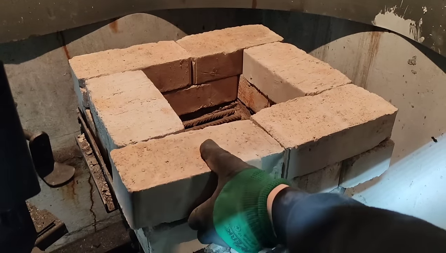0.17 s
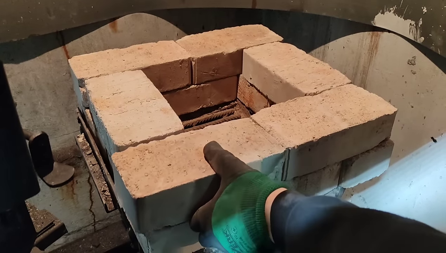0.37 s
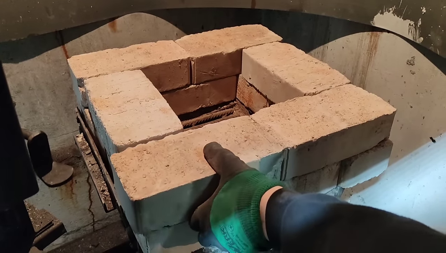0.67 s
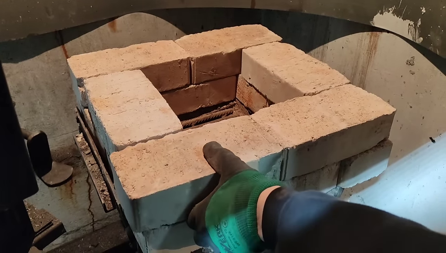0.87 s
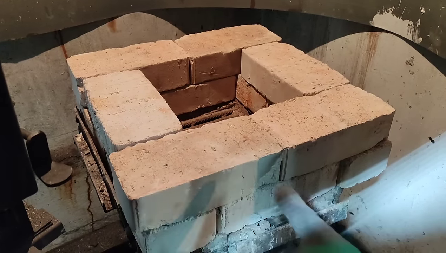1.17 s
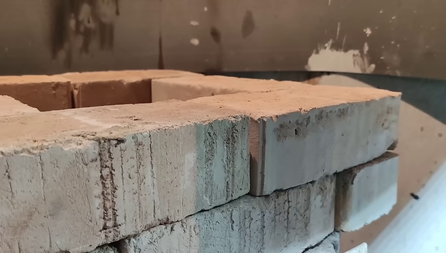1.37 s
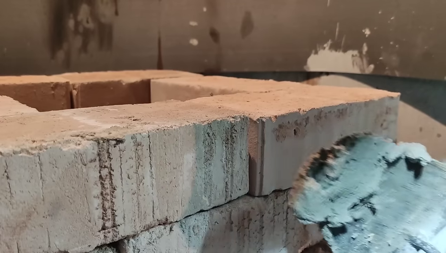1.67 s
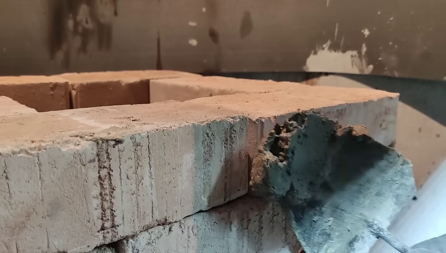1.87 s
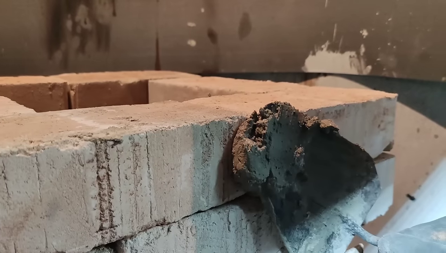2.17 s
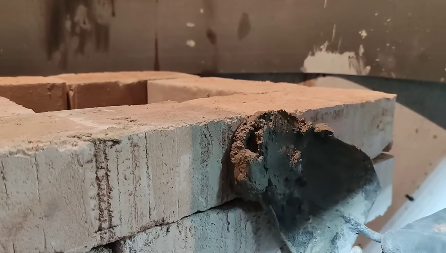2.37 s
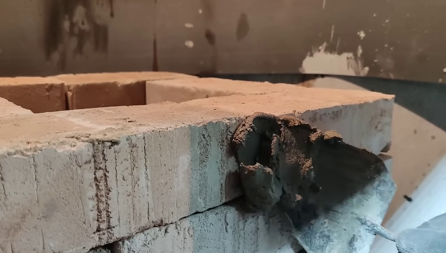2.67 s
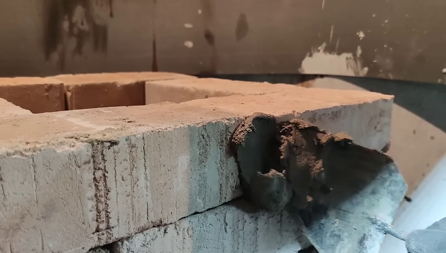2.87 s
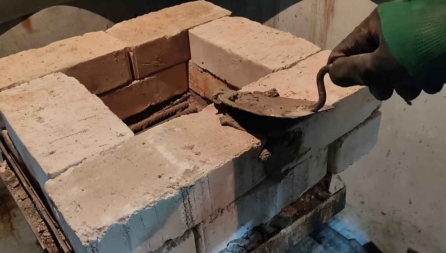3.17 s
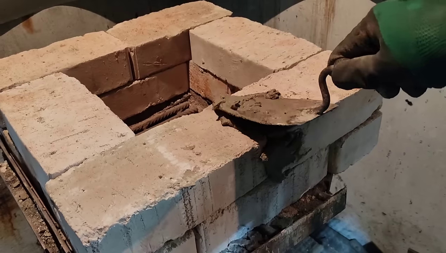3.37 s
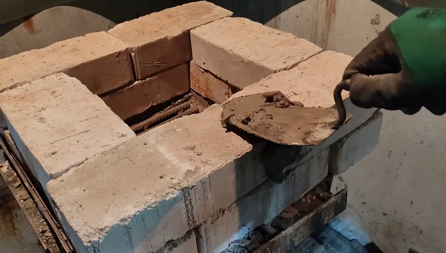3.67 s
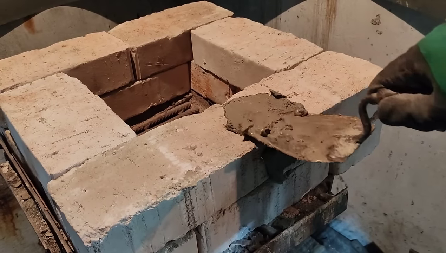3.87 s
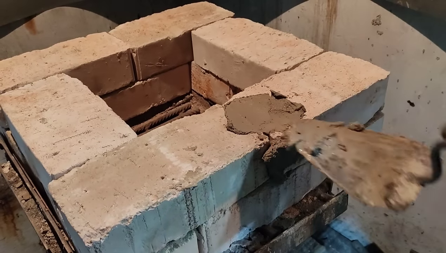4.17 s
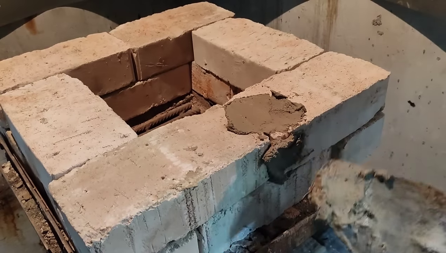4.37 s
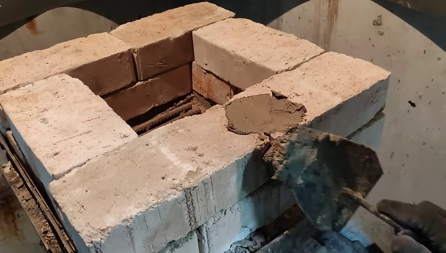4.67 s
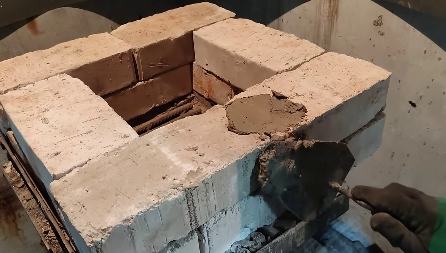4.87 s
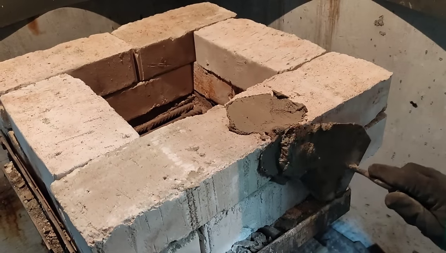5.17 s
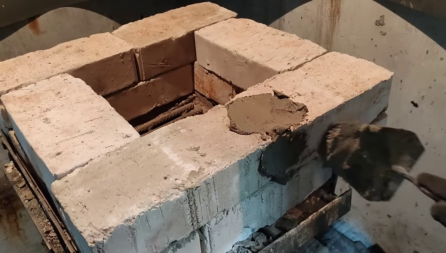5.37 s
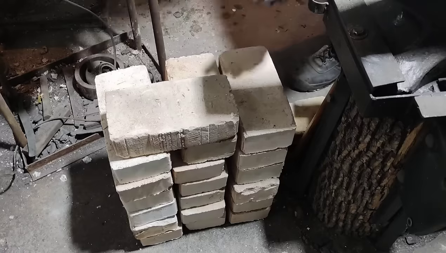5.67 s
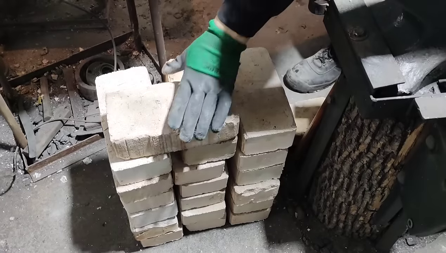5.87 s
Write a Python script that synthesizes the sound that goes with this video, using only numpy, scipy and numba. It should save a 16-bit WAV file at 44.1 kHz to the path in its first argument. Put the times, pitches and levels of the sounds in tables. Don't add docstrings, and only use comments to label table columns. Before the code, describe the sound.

Faint rubbery rubs on brick give way to bright, sandy trowel scrapes, metallic ticks and short ringing squeaks, with abrupt scene cuts.

```python
import sys
import numpy as np
from scipy import signal
from scipy.fft import rfft, irfft, next_fast_len
from scipy.io import wavfile
from scipy.ndimage import uniform_filter1d
from numba import njit

SR = 44100
rng = np.random.default_rng(int(sys.argv[2]) if len(sys.argv) > 2 else 0)


def wav_record(signal):
    frames = np.transpose(np.atleast_2d(signal))
    bounded = np.clip(frames, -1, 1)
    quanta = np.round(bounded * 32767).astype(np.int16)
    wavfile.write(sys.argv[1], SR, quanta)


def field_ratio(decibels):
    return 10 ** (np.asarray(decibels, dtype=float) / 20)


N = 265482
SIZE = next_fast_len(N + SR // 2)
HZ = np.arange(SIZE // 2 + 1) * SR / SIZE + 1e-3
TIME = np.arange(N) / SR

BAND_EDGES_HZ = [700, 2000, 4500, 9000]
CUTS_S = 3.246, 5.716
# frequency in Hz, level in dB per Hz.
SCRAPE_SPECTRUM = [(71, -33), (120, -32.5), (301, -9), (355, -22.5), (503, -15.5), (742, -13.5), (1210, -6),
                   (1430, -6.5), (4230, -8), (7200, 2.5), (10200, -12.5), (15000, -7.5), (16000, -2.5)]
# frequency in Hz, t60 in seconds, level over the dense modes in dB.
BLADE_MODES = [(259, 0.14, 3), (310.3, 0.51, 21), (522, 0.33, -20), (905, 0.1, 9), (1194.6, 0.12, 13.5),
               (1336, 0.057, 17), (1614.6, 0.081, 39), (2290, 0.14, -4.5), (2520, 0.3, -28)]
# start in seconds, end in seconds, first pitch in Hz,
# last pitch in Hz, level in dB.
EDGE_TONES = [(2.195, 2.26, 2600, 2550, 1.5), (2.21, 2.32, 926, 736, 9), (3.5, 3.8, 1980, 2010, -9),
              (2.35, 2.47, 2440, 2340, 3), (2.36, 2.7, 1590, 1250, 6), (2.46, 2.68, 4500, 4500, -0.5),
              (2.71, 2.78, 2520, 2470, 3), (2.72, 2.93, 3850, 3970, -5), (2.78, 2.95, 970, 1030, -2.5),
              (3.17, 3.24, 1736, 1700, 5), (3.25, 3.345, 1830, 1850, 12.5), (3.342, 3.54, 1730, 1870, 4),
              (3.342, 3.38, 3100, 3080, 3), (3.36, 3.9, 960, 960, -8.5), (3.84, 3.9, 6600, 6460, -4),
              (3.95, 4.3, 3360, 3020, 6.5), (4.05, 4.45, 1280, 1250, -5.5), (5.036, 5.085, 1365, 1350, 9),
              (5.11, 5.42, 1450, 1370, 0.5), (5.21, 5.31, 2480, 2760, 0), (5.4, 5.68, 1200, 1165, -2),
              (5.6, 5.715, 1730, 1740, 7), (5.8, 5.85, 1738, 2090, 1), (5.88, 5.97, 2300, 2200, 4)]


def trowel(ears, pressure):
    under = [0 * HZ] + [below(hz) for hz in BAND_EDGES_HZ] + [0 * HZ + 1]
    tone = causal(colour(SCRAPE_SPECTRUM))
    bands = [np.sqrt(np.maximum(high - low, 0)) * tone for low, high in zip(under, under[1:])]
    audible = (HZ > 200) & (HZ < 15500)
    bands = [band / np.sqrt(np.mean(abs(band * audible) ** 2)) for band in bands]
    force = pressure * grit(2000, 3.5, hiss=0.58, chatter_db=1.0)
    drive = irfft(sum(band * rfft(f, SIZE) for band, f in zip(bands, force)), SIZE)[:N]

    click_filter = unit(tone * np.sqrt(1 - below(1270)))
    catches = ticks(burst_s=0.002, ring_s=0.0029, ring_share=0.31)
    click = field_ratio(1.0) * irfft(click_filter * rfft(catches, SIZE), SIZE)[:N]

    place = field_ratio(12.5 * np.array([walk(45) for _ in range(4)]))
    place /= np.sqrt(np.sum(place ** 2, axis=0))
    riding = force[1:3].mean(axis=0) * place[1] ** 0.25
    click += field_ratio(5.5) * rings(EDGE_TONES, riding, width=0.071)

    bodies = [body(BLADE_MODES, 0.083, 0.72, 1360, -6.5, 0.17, count=240) for _ in place]
    edge = 0.5 * bodies[0] + 0.32 * np.exp(-2j * np.pi * HZ * np.array([[7], [0]]) / SR)
    middle = (TIME >= CUTS_S[0]) & (TIME < CUTS_S[1])
    out = np.zeros((2, N))
    for shot in (middle, ~middle):
        heard = sum(h * rfft(drive * w * shot, SIZE) for h, w in zip(bodies, place))
        heard = heard + edge * rfft(click * shot, SIZE)
        out += shot * irfft(heard * ears, SIZE)[:, :N]
    return out


# level over the hiss in dB, share of the clay load,
# share of the fade.
SCRAPE_PARTS = [
    (-18.5, 1.07, 0.71),
    (-10.5, 1.24, 0.84),
    (0.5, 0.29, 1.056),
    (-1, -0.035, 1.29),
    (-6.5, 0.01, 1.65),
]
# peak in seconds,
# grit hiss in dB, rise in seconds, fall in seconds, clay load in dB.
FACE_PUSHES = [(2.197, -50.5, 0.0018, 0.062, 8), (2.223, -47, 0.017, 0.059, 9),
               (2.375, -63, 0.08, 0.23, 13), (2.49, -61, 0.058, 0.18, 14.5),
               (2.538, -50, 0.0087, 0.022, 11), (2.56, -53.5, 0.056, 0.19, 2.5),
               (2.62, -54.5, 0.038, 0.31, 8), (2.74, -57, 0.031, 0.26, 10.5), (2.8, -45.5, .002, 0.23, 4.5),
               (2.905, -46, 0.16, 0.043, -10), (3.02, -49, 0.12, .05, 3), (3.038, -35.5, 0.0067, 0.071, 2),
               (3.151, -32.5, 0.091, 0.33, -6.5), (3.233, -34.5, 0.12, 0.04, 12)]
TOP_PUSHES = [(3.26, -56, 0.019, 0.11, -0.5), (3.344, -44.5, 0.0018, 0.29, -3.5),
              (3.41, -28, 0.0047, 0.037, -8.5), (3.449, -36.5, 0.022, 0.066, -9),
              (3.526, -45.5, 0.013, 0.22, -18), (3.6, -46.5, .08, 0.19, -4), (3.73, -44, 0.19, 0.16, -9.5),
              (3.843, -41, 0.0022, .05, -4), (3.857, -39.5, 0.017, 0.043, -6.5),
              (4.03, -52, 0.26, 0.089, -4), (4.049, -34, 0.006, 0.055, -5.5),
              (4.098, -27, 0.0026, 0.024, -8.5), (4.222, -32, 0.14, 0.079, -2.5),
              (4.4, -66.5, 0.19, 0.31, 4), (4.47, -62, .04, 0.054, 0)]
JOINT_PUSHES = [(4.992, -58.5, 0.014, 0.062, -11), (5.039, -45.5, 0.0036, 0.026, 4.5),
                (5.101, -42, 0.039, 0.063, 0), (5.119, -34.5, 0.0044, 0.15, 2),
                (5.202, -36.5, 0.0023, 0.13, -12), (5.264, -34, 0.087, 0.17, 2.5),
                (5.49, -38.5, 0.26, 0.12, -10), (5.527, -27, 0.018, .1, -4), (5.568, -32.5, 0.14, 0.049, 0),
                (5.727, -67, 0.013, 0.066, 12), (5.817, -60.5, 0.015, 0.036, 7), (5.9, -76, .1, 0.1, 13)]


def stroke_gains():
    power = np.zeros((len(SCRAPE_PARTS), N))
    shot = np.searchsorted(CUTS_S, TIME)
    part_db, load, linger = np.transpose(SCRAPE_PARTS)[:, :, None]
    for s, db, rise_s, fall_s, load_db in FACE_PUSHES + TOP_PUSHES + JOINT_PUSHES:
        at = (shot == np.searchsorted(CUTS_S, s)) & (abs(TIME - s) < 0.6)
        level_db = db + part_db + load * load_db - linger * fade_db(s, rise_s, fall_s)[at]
        power[:, at] += field_ratio(2 * level_db)
    return np.sqrt(power)


def fade_db(s, rise_s, fall_s, rounding=1.213):
    return 20 * np.maximum((s - TIME) / rise_s, (TIME - s) / fall_s) ** rounding


def grit(per_s, spread_db, hiss, chatter_db):
    there = rng.random(N) < per_s / SR
    size = rng.exponential(size=N)
    sign = rng.standard_normal(N)
    grains = unit(there * field_ratio(spread_db * np.minimum(size, 5)) * np.sign(sign))
    chatter = field_ratio(chatter_db * walk(70) + chatter_db * walk(25))
    return unit((grains + hiss * sign) * chatter)


# time in seconds, peak level in dB, pitch in Hz.
EDGE_CATCHES = [(2.198, -22, 2400), (2.219, -21, 5740), (2.3752, -27.5, 1594), (2.454, -35, 2380),
                (2.485, -28, 1360), (2.5355, -30, 4500), (2.6203, -21, 2390), (2.73, -33, 2380),
                (2.8007, -28, 1690), (3.0438, -22, 7800), (3.106, -34, 6900), (3.146, -10, 7600),
                (3.1786, -4, 1990), (3.3428, -18.5, 2070), (3.3962, -17.5, 1670), (3.4103, -12.5, 6560),
                (3.4493, -24, 7000), (3.5242, -21, 7300), (3.694, -20, 6800), (3.841, -22.5, 7200),
                (3.8509, -12, 6600), (4.0441, -17.5, 6100), (4.1583, -19, 3100), (4.217, -11, 7060),
                (4.3558, -29.5, 1230), (5.1179, -12, 5550), (5.2003, -13, 1370), (5.241, -20, 6650),
                (5.524, -3, 5370), (5.816, -31.5, 1720)]


def ticks(burst_s, ring_s, ring_share):
    out = np.zeros(N + SR)
    t = np.arange(SR // 20) / SR
    sprays = rng.standard_normal((60, len(t)))
    for (s, db, hz), spray in zip(EDGE_CATCHES, sprays):
        spray = 0.5 * spray * np.exp(-t / burst_s)
        spray[0] = 1
        hold = np.exp(-2 * np.pi * 0.6 * hz / SR)
        spray = signal.lfilter([np.sqrt(1 - hold ** 2)], [1, -hold], spray)
        spray += ring_share * np.sin(2 * np.pi * hz * t) * np.exp(-t / ring_s)
        start = int(s * SR)
        out[start:start + len(t)] += field_ratio(db) * spray
    return out[:N]


def rings(table, force, width):
    out = np.zeros(N)
    for start, end, from_hz, to_hz, db in table:
        stop = min([end + 0.05] + [cut for cut in CUTS_S if cut > start])
        at = slice(int(start * SR), int(stop * SR))
        along = (TIME[at] - start) / (end - start)
        fed = force[at] * np.clip(8 * along, 0, 1) * np.clip(4 * (1 - along), 0, 1)
        pitch = from_hz + (to_hz - from_hz) * along
        wide = width * from_hz
        out[at] += field_ratio(db) * svf(fed, pitch, wide) * np.sqrt(SR / np.pi / wide)
    return out


@njit
def svf(x, hz, width):
    y, b, l = np.empty(len(x)), 0., 0.
    for i in range(len(x)):
        g, k = np.tan(np.pi * hz[i] / SR), width / hz[i]
        v = (b + g * (x[i] - l)) / (1 + g * (g + k))
        b, l, y[i] = 2 * v - b, l + 2 * g * v, k * v
    return y


def body(modes, t60_s, direct, alike_hz, room_db, room_t60_s, count):
    t = np.arange(SR // 2) / SR
    hz = 150 + (np.arange(count) + rng.random(count)) * 16000 / count
    dense = np.transpose([hz, t60_s * (1000 / hz) ** 0.13, 0 * hz])
    hz, t60, db = np.vstack([dense, modes]).T
    alike = 1 / (1 + (hz / alike_hz) ** 2)
    mid, side = rng.standard_normal((2, len(hz)))
    shape = field_ratio(db) / np.sqrt(t60) * two_ports(mid, side, alike)

    near = np.zeros((2, len(HZ)), complex)
    decay_hz = np.log(1000) / t60 / (2 * np.pi)
    for f, decay, gain in zip(hz, decay_hz, shape.T):
        at = slice(max(int((f - 250) * SIZE / SR), 0), int((f + 250) * SIZE / SR))
        near[:, at] += gain[:, None] / (decay + 1j * (HZ[at] - f))
    near = near / np.sqrt(uniform_filter1d(np.mean(abs(near) ** 2, axis=0), size=1600) + 1e-12)
    delay = rng.integers(0, 24, (2, 1)) / SR
    near = near + direct * np.exp(-2j * np.pi * HZ * delay)

    tail = rng.standard_normal((2, len(t))) * np.exp(-np.log(1000) * t / room_t60_s) * (t > 0.004)
    total = near + field_ratio(room_db) * unit(rfft(tail, SIZE))
    return total / np.sqrt(1 + direct ** 2 + field_ratio(2 * room_db))


# peak in seconds, level in dB, rise in seconds, fall in seconds,
# body in dB.
GLOVE_RUBS = [
    (.02, -80.5, 0.039, 0.069, 4.5),
    (.185, -66.5, 0.053, 0.18, 2),
    (.37, -57, 0.077, 0.075, -3.5),
    (.56, -63.5, 0.089, 0.1, -2),
    (.76, -63, 0.074, 0.087, 1.5),
    (.92, -60, .025, .09, -4.5),
    (1.1, -64, .06, 0.086, -1.5),
]
# start in seconds, end in seconds, first pitch in Hz,
# last pitch in Hz, level in dB.
BRICK_TONES = [
    (0, 0.054, 1100, 1100, 13),
    (0.15, 0.232, 1120, 1140, -4),
    (0.314, 0.425, 1110, 1130, -5),
    (0.305, 0.454, 2420, 2360, 5),
    (.53, .65, 1640, 1650, -15),
    (.72, .82, 1650, 1650, -17),
    (.92, 1.0, 2450, 2450, -2),
    (1.06, 1.19, 2200, 2150, 7),
]


def glove(ears):
    grains = grit(6000, 3.5, hiss=1.3, chatter_db=1.95)
    gains = [field_ratio(db - fade_db(s, rise_s, fall_s, rounding=1.73)) for s, db, rise_s, fall_s, _ in GLOVE_RUBS]
    force = grains * sum(gains)
    pressed = grains * sum(gain * field_ratio(rub[-1]) for gain, rub in zip(gains, GLOVE_RUBS))
    low = np.sqrt(below(3000) - below(980))
    high = np.sqrt(below(6900) - below(5300)) + 0.021 * np.sqrt(1 - below(5900))
    tones = rings(BRICK_TONES, pressed, width=0.13)
    parts = field_ratio(-1.0) * unit(low) * rfft(pressed, SIZE)
    parts = parts + unit(high) * rfft(force, SIZE) + field_ratio(-4.0) * rfft(tones, SIZE)
    brick = body(BLADE_MODES[:1], 0.05, 0.72, 600, -16, 0.22, count=200)
    return irfft(parts * brick * ears, SIZE)[:, :N]


# time in seconds, peak level in dB, pitch in Hz,
# t60 in seconds.
DULL_BLOWS = [
    (0.024, -55, 157, 0.24),
    (0.07, -44.5, 191, 0.1),
    (3.394, -56, 246, 0.17),
    (4.328, -42, 149, 0.051),
    (4.702, -52, 299, 0.071),
    (5.801, -56.5, 403, .08),
    (2.2, -56, 377, 0.11),
    (5.046, -34, 249, 0.12),
    (5.085, -46.5, 312, 0.46),
    (5.539, -46, 308, 0.26),
]


def bumps():
    out = np.zeros(N)
    for s, db, hz, t60 in DULL_BLOWS:
        t = np.maximum(TIME - s, 0)
        pair = np.sin(2 * np.pi * hz * t) + 0.5 * np.sin(2 * np.pi * 1.2 * hz * t)
        out += field_ratio(db) * pair * (1 - np.exp(-t / 0.0046)) * np.exp(-np.log(1000) * t / t60)
    return out


# frequency in Hz, level in dB per Hz.
RUMBLE_SPECTRUM = [(8.8, -30), (15, 15.5), (27, -5), (54, -3), (81, -17), (124, -18), (198, -16),
                   (313, -19.5), (458, -35), (500, -40), (650, -50), (1100, -120)]
# frequency in Hz, level in dB per Hz.
AIR_SPECTRUM = [(210, -36), (350, -0.5), (452, -5), (514, -6), (754, -10), (974, -10.5), (1450, -13),
                (1600, -12), (2240, -12), (3130, -11), (3670, -15), (6430, -12), (8710, -16), (15000, -19),
                (16000, -18)]
# start in seconds, deep rumble in dB, drone in dB, air in dB,
# drone drift in dB per second.
SHOTS = [
    (0, -54.5, -64.5, -66, -4),
    (1.381, -58, -72.5, -66, -2.5),
    (3.247, -58.5, -69.5, -64.5, -1.5),
    (5.716, -59, -74.5, -65.5, 11),
]


def shop(ears, pressure):
    shots = np.array(SHOTS)
    s, rumble_db, drone_db, air_db, drift_db = shots[np.searchsorted(shots[1:, 0], TIME)].T
    mid, side = rfft(rng.standard_normal((2, SIZE)))
    alike = 0.8 * below(350) ** 0.25 * (1 - 0.25 * below(60))
    noise = two_ports(mid, side, alike)
    low_noise = noise * field_ratio(colour(RUMBLE_SPECTRUM))
    rumble = unit(irfft(low_noise * np.sqrt(below(96)), SIZE)[:, :N])
    drone = unit(irfft(low_noise * np.sqrt(below(308) - below(81.0)), SIZE)[:, :N])
    air_noise = noise * field_ratio(colour(AIR_SPECTRUM)) * np.sqrt(1 - below(453))
    air = unit(irfft(air_noise * ears ** 0.26, SIZE)[:, :N])

    shake_db, shake_s = -10, 0.032
    pushes = np.split(pressure, np.searchsorted(TIME, CUTS_S))
    shake = field_ratio(shake_db) * np.hstack([uniform_filter1d(part, int(shake_s * SR)) for part in pushes])
    lows = rumble * np.hypot(field_ratio(rumble_db - 2.0 + 1.2 * walk(5.4)), 0.6 * shake)
    lows += drone * np.hypot(field_ratio(drone_db + drift_db * (TIME - s) + 2.3 * walk(5.46)), shake)
    return lows + air * field_ratio(air_db + 0.15 * walk(13.0))


# frequency in Hz, left minus right in dB.
PORT_TILT = [(200, -2.5), (1300, 2), (2400, -5.5), (4400, -4), (6000, -7.5), (7600, 2), (9000, 8),
             (11000, -4.5), (13500, -4.5), (15500, -30)]
# frequency in Hz, width in Hz, level in dB.
PORT_PEAKS = [
    (8000, 1800, 6.5),
    (6300, 1200, 4),
]


def ports():
    gain = []
    for side, (hz, width, db) in zip((1, -1), PORT_PEAKS):
        peak_db = db / (1 + (2 * (HZ - hz) / width) ** 2)
        gain.append(field_ratio(side * colour(PORT_TILT) / 2 + peak_db))
    return np.array(gain) / np.sqrt(np.mean(np.square(gain), axis=0))


def two_ports(mid, side, alike):
    return np.sqrt(1 + alike) * mid + np.sqrt(1 - alike) * side * np.array([[1], [-1]])


def colour(points):
    hz, db = np.transpose(points)
    return np.interp(np.log(HZ), np.log(hz), db)


def causal(db):
    cepstrum = irfft(db * np.log(10) / 20, SIZE)
    cepstrum[1:SIZE // 2] *= 2
    cepstrum[SIZE // 2:] = 0
    return np.exp(rfft(cepstrum))


def below(hz):
    return 1 / (1 + (HZ / hz) ** 8)


def unit(x):
    return x / np.sqrt(np.mean(np.abs(x) ** 2))


def walk(rate):
    k = int(SR / rate)
    held = np.repeat(rng.standard_normal(N // 200), k)[:N]
    return unit(uniform_filter1d(uniform_filter1d(held, k), k))


def scene():
    ears = ports()
    pressure = stroke_gains()
    return field_ratio(-1.5) * trowel(ears, pressure) + glove(ears) + bumps() + shop(ears, pressure[0])


def band_limit(x):
    return signal.sosfilt(signal.butter(12, 16660, fs=SR, output="sos"), x)


def record(dry):
    dip_s, depth = 0.003, 0.75
    for s, *_ in SHOTS[1:]:
        dry = dry * (1 - depth * np.exp(-((TIME - s) / dip_s) ** 2))
    top = signal.ellip(10, 0.2, 60, 15620, fs=SR, output="sos")
    return band_limit(signal.sosfilt(top, dry))


dry = scene()
out = record(dry)
wav_record(out)
```